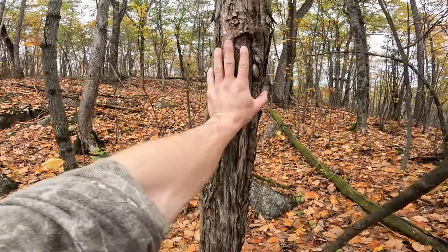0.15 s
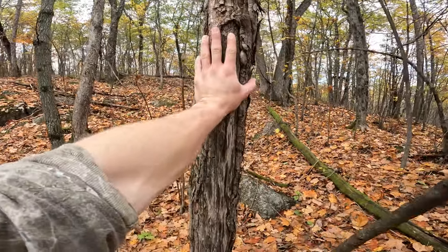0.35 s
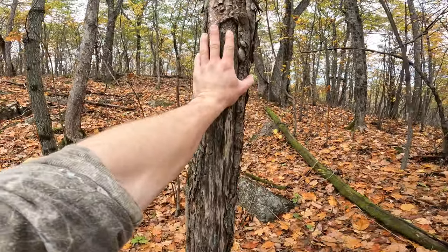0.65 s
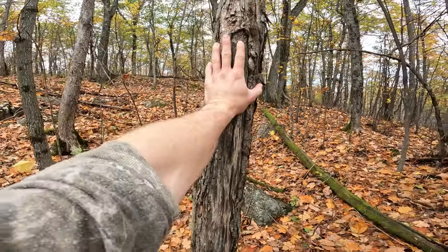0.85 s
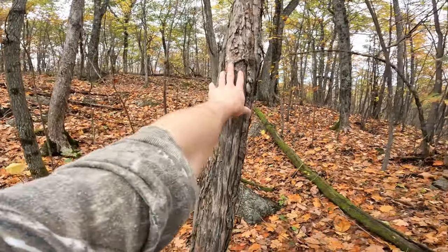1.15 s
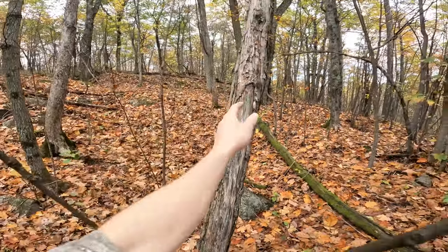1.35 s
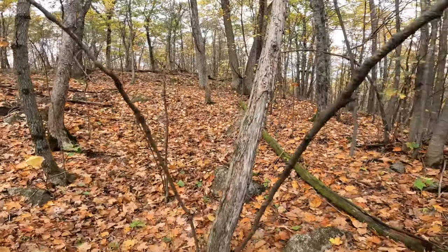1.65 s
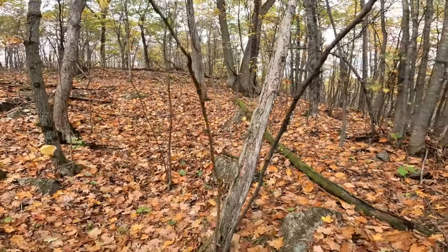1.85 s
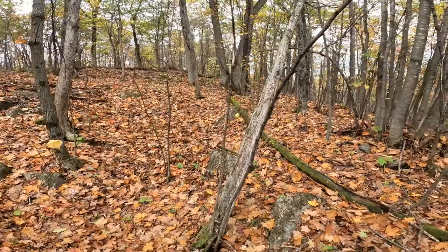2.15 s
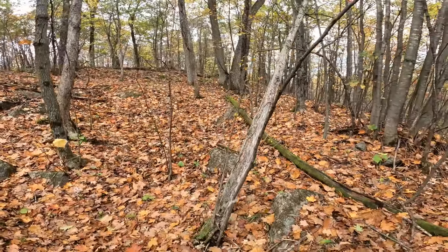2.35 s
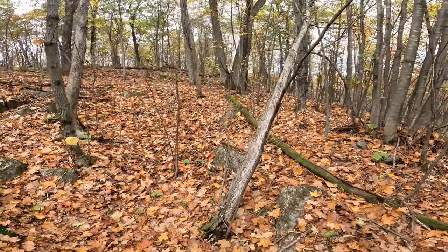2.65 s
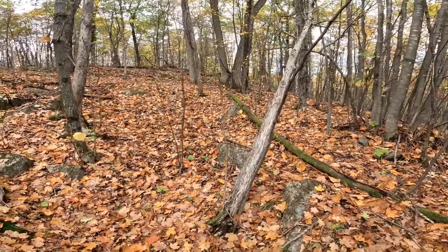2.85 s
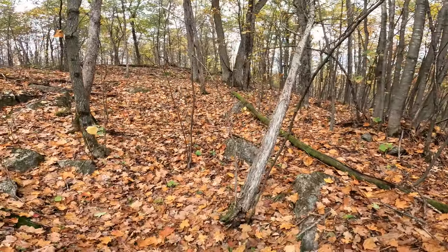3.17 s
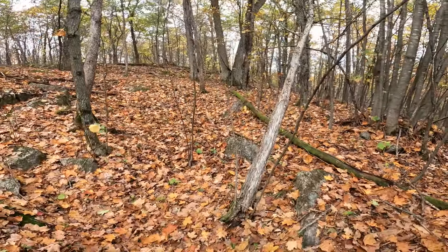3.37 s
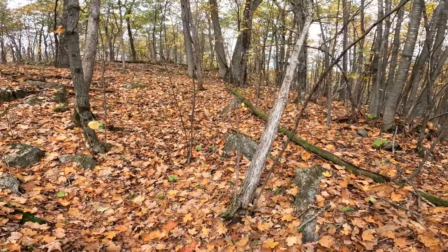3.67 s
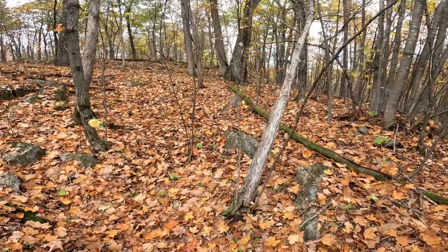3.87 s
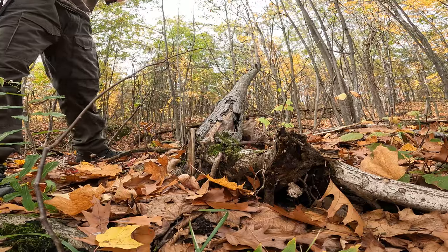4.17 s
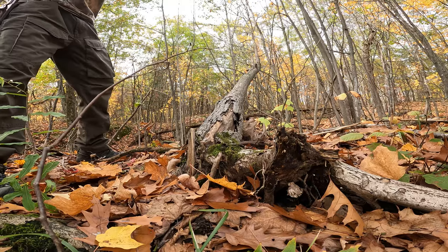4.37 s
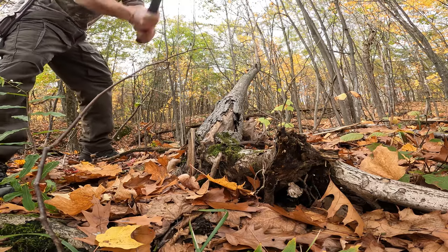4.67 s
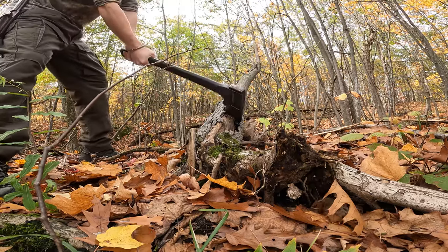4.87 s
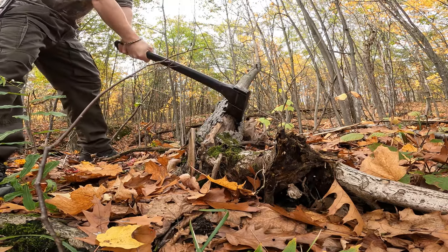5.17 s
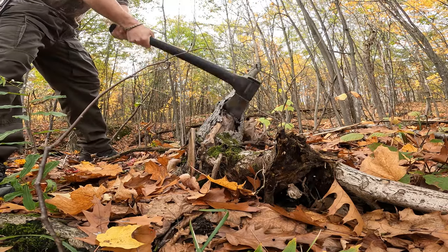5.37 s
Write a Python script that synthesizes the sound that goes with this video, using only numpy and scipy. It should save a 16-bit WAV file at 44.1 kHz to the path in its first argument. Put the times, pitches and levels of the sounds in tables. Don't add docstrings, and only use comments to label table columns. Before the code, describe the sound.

Rotten wood snaps and splinters with hollow knocks and leaf crackle, the fall fades, and a single axe chop lands close by.

```python
import sys
import numpy as np
from scipy import signal
from scipy.fft import rfft, irfft, next_fast_len
from scipy.io import wavfile
from scipy.ndimage import uniform_filter1d

SR = 44100
rng = np.random.default_rng(int(sys.argv[2]) if len(sys.argv) > 2 else 0)


def dump(signal):
    limited = np.clip(np.atleast_2d(signal).T, -1, 1)
    pcm = np.round(limited * 32767).astype(np.int16)
    wavfile.write(sys.argv[1], SR, pcm)


def how_loud(loudness_db):
    steps = np.asarray(loudness_db, float) / 20
    return 10 ** steps


N = 243431
SECONDS = np.arange(N) / SR
NEAR_GROUND = np.arange(N) > 4.27 * SR
LEFT_RIGHT = np.array([[1], [-1]])
LEAD, ROOM = 400, 2400


def rms_one(x):
    return x / np.sqrt(np.mean(x ** 2) + 1e-20)


def peak_one(x):
    return x / np.sqrt(2 * uniform_filter1d(x ** 2, size=50).max() + 1e-20)


def in_time(rows):
    s, *columns = np.transpose(rows)
    return [np.interp(SECONDS, s, c) for c in columns]


def coloured(x, points):
    size = next_fast_len(x.shape[-1])
    hz = np.arange(size // 2 + 1) * SR / size
    point_hz, point_db = np.transpose(points)
    level_db = np.interp(np.log(hz + 1), np.log(point_hz), point_db)
    return irfft(rfft(x, size) * how_loud(level_db), size)[..., :x.shape[-1]]


def band(x, low_hz, high_hz):
    return signal.sosfilt(signal.butter(2, [low_hz, high_hz], "band", fs=SR, output="sos"), x)


def resonance(x, hz, sharpness):
    return signal.lfilter(*signal.iirpeak(hz, sharpness, fs=SR), x)


def ring(clicks, hz, t60):
    r, w = how_loud(-60 / (max(t60, 1e-4) * SR)), 2 * np.pi * hz / SR
    return signal.lfilter([0, np.sin(w)], [1, -2 * r * np.cos(w), r * r], clicks + 1e-18)


def drift(rate):
    r = np.exp(-40 * np.pi * rate / SR)
    slow = signal.lfilter([1], [1, -2 * r, r * r], rng.standard_normal(N // 20 + 2002))[2000:]
    return np.interp(np.arange(N) / 20, np.arange(len(slow)), rms_one(slow))


def crackle(per_s, spread_db, hiss, clumps):
    sizes = how_loud(spread_db * np.minimum(rng.exponential(1, N), 5)) * rng.choice([-1, 1], N)
    happens = rng.random(N) < per_s * clumps / SR
    return sizes * happens + hiss * np.sqrt(clumps) * rng.standard_normal(N)


def many_pitches(clicks, low_hz, high_hz, count, cycles):
    pitches, dealt = np.geomspace(low_hz, high_hz, count), rng.integers(0, count, N)
    return sum(ring(clicks * (dealt == k), hz, cycles / hz) for k, hz in enumerate(pitches))


def swell(s, peak_db, length_s, rise):
    step = np.arange(0, N, 64) / SR
    late = (step - np.c_[s]) / np.maximum(np.c_[length_s], .005)
    fallen = np.where(late < 0, -late / rise, late)
    power = how_loud(2 * (np.c_[peak_db] - 10 * fallen)).sum(axis=0)
    return np.interp(SECONDS, step, power)


def sum_db(*powers):
    return 10 * np.log10(sum(powers) + 1e-12)


def tears(rows, rise, fall):
    ms = (np.arange(ROOM) - LEAD) * 1000 / SR
    length = np.maximum(np.array(rows)[:, 4:], .5)
    fibres = rng.standard_normal((len(rows), 2, len(ms)))
    growing = np.exp(np.minimum(ms, 0) / (rise * length))
    dying = np.exp(-np.abs(ms) / (fall * length))
    shape = np.where(ms < 0, growing, dying)
    shape = shape + how_loud(-18.5) * (ms > 0) * np.exp(-np.abs(ms) / 9.9)
    core = 6.0 * np.sign(fibres[:, 1, :1]) * (ms == 0) / length
    return fibres[:, 0] * how_loud(1.7 * fibres[:, 1]) * shape + core, ms


def add(out, s, sound, pan_db):
    at = round(s * SR) - LEAD
    out[:, at:at + len(sound)] += sound * how_loud(0.5 * pan_db * LEFT_RIGHT)


# (time [s], ring pitch [Hz], ring level [dB],
# thud level [dB])
HEAVY_KNOCKS = [(0.445, 970, -19, -17), (0.618, 595, -17.5, -36), (0.6583, 605, -15.5, -53),
                (0.855, 730, -15, -43), (0.933, 350, -22, -50), (0.9374, 360, -20, -24),
                (1.1777, 660, -23.5, -24.5), (1.2012, 430, -33, -38), (1.319, 390, -18.5, -14.5),
                (1.3356, 1110, -23, -29), (1.371, 826, -16.5, -20.5), (1.846, 865, -24.5, -43),
                (1.8526, 720, -27, -25), (1.867, 760, -19.5, -27), (2.1276, 530, -22, -40.5),
                (2.3346, 570, -18.5, -20.5), (2.3924, 740, -20, -40), (3.19, 360, -36.5, -39),
                (3.471, 378, -42, -42), (3.511, 433, -44, -33), (4.129, 360, -65, -43),
                (4.633, 440, -40.5, -37.5), (4.6876, 364, -42.5, -37.5), (4.8614, 877, -32.5, -46.5),
                (4.8718, 870, -18.5, -22.5)]
# (time [s], ring pitch [Hz], ring level [dB])
BRANCH_TAPS = [(0.6996, 885, -25), (0.7156, 890, -18.5), (0.7395, 905, -22), (0.7463, 910, -21),
               (0.775, 860, -26), (0.8913, 695, -26.5), (1.021, 1150, -27), (1.1224, 584, -33.5),
               (1.4553, 370, -38), (1.4818, 800, -22.5), (1.999, 420, -24.5), (2.058, 516, -23.5),
               (2.2289, 604, -26.5), (2.7584, 550, -31.5), (3.0765, 1080, -31.5), (3.0914, 1120, -28),
               (3.789, 1190, -33), (4.3256, 1110, -37), (5.054, 1055, -38.5)]


def knock_rows():
    breaks = [(*r, 1000 * 5.5 / r[1]) for r in HEAVY_KNOCKS]
    return breaks + [(*r, r[2] - 20.5, 1000 * 2.4 / r[1]) for r in BRANCH_TAPS]


# (pitch [Hz], level [dB], fade by 60 dB [s])
TRUNK_THUD = [(188, 9, 0.026), (275.3, -12, 0.064), (130, -21, 0.054)]


def knocks():
    out = np.zeros((2, N + ROOM))
    rows = knock_rows()
    bursts, ms = tears(rows, rise=0.31, fall=0.13)
    woody, place = band(bursts, 330, 1300), rng.uniform(-1, 1, len(rows))
    push = (ms > -1.5) * (ms < 0) * 1.
    thud = sum(how_loud(db) * ring(push, hz, t60) for hz, db, t60 in TRUNK_THUD)
    thud = thud * np.cos(np.clip(ms / 29, 0, np.pi / 2))
    thud = peak_one(band(thud, 185, 410))
    for k, (s, hz, ring_db, thud_db, _) in enumerate(rows):
        body = peak_one(ring(woody[k], hz, 8.2 / hz)) + 0.082 * peak_one(woody[k])
        sound = how_loud(ring_db) * peak_one(body) + how_loud(thud_db - 0.5) * thud
        add(out, s - .0008, sound, 1.2 * place[k])
    return out[:, :N]


# (time [s], ring pitch [Hz], #
# ring level [dB], bright level [dB])
TWIG_SNAPS = [(0.4348, 1600, -14, -26.5), (0.586, 2770, -14.5, -24.5), (0.6154, 1870, -14, -23.5),
              (0.7386, 1120, -28, -41), (0.8434, 2000, -19, -29), (0.901, 2620, -27, -49),
              (0.93, 3120, -13.5, -21), (0.972, 1740, -28, -55), (1.0208, 1190, -26.5, -28.5),
              (1.094, 3000, -28.5, -32), (1.2562, 1220, -33.5, -42), (1.334, 1430, -18, -36),
              (1.3583, 3090, -53, -31), (1.37, 1610, -13, -26.5), (1.681, 3530, -51, -34),
              (1.89, 2150, -23, -29), (2.1272, 1220, -27, -36), (2.152, 2640, -24, -31.5),
              (2.2308, 2820, -15, -8), (2.291, 1710, -46, -25), (2.3264, 1410, -14, -26),
              (2.332, 1280, -15.5, -23), (2.47, 1780, -21, -33), (2.5253, 3320, -27, -13),
              (2.6938, 3400, -28, -45), (2.7231, 2710, -55, -20), (3.3503, 1260, -28, -29),
              (3.791, 2440, -36, -13), (4.3253, 2300, -32, -37), (4.8825, 4900, -31.5, -22)]
# (time [s], ring pitch [Hz], ring level [dB], bright level [dB])
FIBRE_TEARS = [(0.4434, 1730, -15.5, -22), (0.656, 2450, -18.5, -26.5), (0.6993, 1640, -26, -31),
               (0.716, 1990, -16.5, -28), (0.746, 1390, -22, -32), (0.776, 1190, -24.5, -34),
               (0.811, 1160, -27.5, -30), (0.817, 1530, -27, -32), (0.852, 1520, -14, -23),
               (0.937, 1300, -17.5, -36), (1.171, 1420, -19.5, -29), (1.1783, 2580, -21.5, -26),
               (1.3177, 2170, -14.5, -20.5), (1.481, 2010, -25, -29), (1.8506, 2460, -21, -37),
               (1.867, 2680, -21, -36), (1.9014, 1810, -40, -24.5), (2.199, 1440, -25, -41),
               (2.339, 1150, -44, -41), (2.3907, 1150, -19.5, -45), (2.3964, 2550, -20, -24.5),
               (2.4081, 2860, -24, -32), (2.738, 1390, -30, -30), (2.7537, 2850, -27.5, -33),
               (2.8595, 1890, -32.5, -27), (2.971, 1900, -29.5, -33.5), (3.2455, 2960, -28, -35),
               (3.5092, 2730, -27, -37), (3.6868, 3270, -37, -31), (3.7963, 2750, -28.5, -29)]
# (time [s], ring pitch [Hz], ring level [dB])
BARK_FLAKES = [(0.5187, 1940, -36), (0.5755, 1580, -34), (0.648, 2090, -34), (1.007, 1240, -32),
               (1.124, 1140, -33.5), (1.1315, 1380, -33), (1.201, 3040, -32.5), (1.454, 1310, -37),
               (1.551, 3080, -33), (1.663, 1680, -38), (1.983, 1140, -42), (2.2771, 1840, -33),
               (3.5212, 3230, -35), (4.0303, 2520, -38), (4.455, 3080, -47.5), (4.573, 3370, -40),
               (4.6322, 2550, -31.5), (4.6864, 1430, -39.5), (4.862, 3000, -46.5), (4.8730, 3200, -41),
               (4.9177, 3420, -45), (5.214, 2930, -51.5), (5.496, 2990, -48.5)]
# (time [s], bright level [dB])
DRY_TICKS = [
    (0.035, -67),
    (0.06, -54.5),
    (.085, -55),
    (0.121, -51),
]


def snap_rows():
    twig_ms, fibre_ms, flake_ms = 1.75, 5.04, 3.2
    twigs = [(*r, twig_ms * .5 ** np.clip((r[3] - r[2]) / 24, -.3, 1.2)) for r in TWIG_SNAPS]
    fibres = [(*r, fibre_ms) for r in FIBRE_TEARS]
    flakes = [(*r, r[2] - 3, flake_ms) for r in BARK_FLAKES]
    return twigs + fibres + flakes + [(s, 3000, db - 32, db, flake_ms) for s, db in DRY_TICKS]


# (pitch [Hz], level [dB per Hz])
DRY_LEAF_TONE = [(240, -25.5), (450, -3.5), (1100, -2), (2600, -3), (4200, -2.5), (5300, -5), (7000, -3),
                 (8800, -12.5), (10900, -21), (12100, -20), (14600, -32.5), (16000, -47.5)]


def snaps():
    out = np.zeros((2, N + ROOM))
    rows = snap_rows()
    bursts, _ = tears(rows, rise=0.31, fall=0.33)
    piece = rng.uniform(-0.64, 1, (len(rows), 2))
    woody = band(bursts, 920, 5100)
    bright = coloured(band(band(bursts, 4200, 16500), 3600, 22000), DRY_LEAF_TONE)
    for k, (s, hz, ring_db, bright_db, _) in enumerate(rows):
        neighbour = ring(woody[k], 2100 * 1.6 ** piece[k, 0], 0.001)
        body = peak_one(ring(woody[k], hz, 14.0 / hz))
        body = body + 0.99 * peak_one(neighbour) + 0.32 * peak_one(woody[k])
        sound = how_loud(ring_db) * peak_one(body) + how_loud(bright_db) * peak_one(bright[k])
        add(out, s, sound, 1.8 * piece[k, 1])
    return out[:, :N]


# (pitch [Hz], level [dB], fade by 60 dB [s], start after the blow [ms])
FALLEN_LOG = [(149.8, -12, .157, 3.7), (184.8, -10, .1, 4.62), (226, -14, .09, 3.72),
              (433, -9.5, .024, .23), (883, -7, .013, .58), (1182, -5.5, .02, -.3), (1600, -17, .008, .3),
              (3080, -6.5, .0042, .8), (3680, -21, .009, .9), (600, -17, .012, 3.9)]


def axe():
    strike_s, strike_db = 4.8822, .4
    out = np.zeros(N)
    for hz, db, t60, start_ms in FALLEN_LOG:
        blow = np.zeros(N)
        blow[round((strike_s + start_ms / 1000) * SR)] = how_loud(strike_db + db)
        out += ring(blow, hz, t60)
    out = out - .6 * resonance(out, 2150, 6)
    return band(out, 80, 13000)


# (time [s], level [dB])
BOUGH_RUBBING = [(1.2, -75), (1.6, -55.5), (1.9, -51), (2.1, -41.5), (2.24, -45), (2.27, -52), (2.5, -42),
                 (2.66, -65), (2.84, -52), (2.92, -81)]
# (pitch [Hz], level [dB], fade by 60 dB [s])
BOUGH_NOTES = [(510, 3.5, 0.012), (740, -16, 0.015), (992, -6.5, 0.051)]


def bough():
    level_db, = in_time(BOUGH_RUBBING)
    slips = crackle(260, 2.5, 0.038, how_loud(3.1 * drift(19)))
    rings = sum(how_loud(db) * ring(slips, hz, t60) for hz, db, t60 in BOUGH_NOTES)
    return how_loud(level_db) * rms_one(rings)


def bits(rows, length_ms, cycles, spit):
    out = np.zeros((2, N + ROOM))
    bursts, _ = tears([(*r, 0, length_ms) for r in rows], rise=0.9, fall=0.67)
    place = rng.uniform(-1, 1, len(rows))
    for k, (s, hz, ring_db) in enumerate(rows):
        broad = band(bursts[k], hz / 2.13, min(hz * 2.4, 16000))
        broad = coloured(broad, [(8000, -3), (16000, -20.5)])
        body = peak_one(ring(broad, hz, cycles / hz)) + spit * peak_one(broad)
        add(out, s, how_loud(ring_db) * peak_one(body), 2.5 * place[k])
    return out[:, :N]


# (time [s], ring pitch [Hz], ring level [dB])
BOUGH_BUMPS = [(0.1676, 630, -55), (0.1941, 580, -59.0), (0.476, 905, -40), (0.5767, 925, -45),
               (0.9737, 980, -48), (1.0678, 660, -48), (1.0884, 540, -48), (1.0945, 570, -37),
               (1.1409, 540, -38), (1.2582, 540, -38), (1.3199, 487, -30), (1.5521, 580, -38),
               (1.6603, 890, -36.5), (1.8, 610, -45), (1.8519, 720, -30), (1.9171, 570, -26),
               (2.1135, 1020, -26), (2.1643, 950, -44), (2.2288, 740, -37), (2.3002, 654, -33),
               (2.3281, 640, -22), (2.4611, 636, -32), (2.5794, 970, -36.5), (2.6245, 975, -33.5),
               (2.6515, 990, -30.5), (2.6644, 1090, -30), (2.6729, 940, -35), (2.7376, 1060, -43),
               (2.7986, 720, -38), (2.8346, 1010, -35), (2.9244, 1030, -38), (3.0681, 990, -51),
               (3.1267, 1000, -38.5), (3.6057, 1010, -50.0), (3.6917, 520, -59), (4.0317, 1090, -62),
               (4.1797, 1120, -50.0), (4.2341, 1070, -46), (4.3548, 650, -61), (4.5122, 1060, -64),
               (4.5717, 1020, -48), (4.7404, 540, -59), (5.0538, 1050, -47), (5.1271, 540, -50.5),
               (5.4916, 1014, -61), (5.4972, 1030, -57.5)]
# (time [s], ring pitch [Hz], ring level [dB])
BARK_CHIPS = [(0.1486, 1490, -59.0), (0.4099, 1700, -42), (0.4761, 2230, -39), (0.5094, 1750, -37.5),
              (0.5665, 2480, -40), (1.0447, 1490, -39), (1.1116, 3120, -34), (1.1526, 2630, -31),
              (1.351, 1980, -38), (1.5081, 3080, -40), (1.6134, 2380, -37), (1.7102, 1360, -37),
              (1.9005, 2000, -36), (1.9438, 3750, -35), (2.4647, 1990, -30.5), (2.6742, 1360, -31),
              (2.73, 2700, -30), (2.8379, 2960, -33.5), (2.9206, 1440, -39), (3.0681, 1530, -40),
              (3.447, 2870, -36.5), (3.5322, 3680, -41), (3.6451, 1920, -42), (3.936, 2440, -48),
              (4.2301, 1720, -39), (4.5833, 1440, -59), (4.6198, 1560, -45), (4.702, 1400, -53),
              (4.7124, 2510, -47), (4.9182, 3200, -36), (5.1197, 2770, -47), (5.1673, 2580, -61),
              (5.198, 3660, -49.5), (5.2525, 2760, -55), (5.2832, 2850, -54.5), (5.4204, 3000, -54)]
# (time [s], ring pitch [Hz], ring level [dB])
LEAF_CRACKS = [(0.325, 7400, -47), (0.3719, 7100, -43), (0.5483, 7170, -41), (0.5606, 4460, -40),
               (0.7094, 4400, -30), (0.7539, 6200, -37), (0.8906, 4820, -29), (0.9057, 4650, -34),
               (0.9651, 4700, -44), (1.1112, 4190, -39), (1.1371, 7400, -38), (1.1524, 4340, -37),
               (1.2241, 4840, -46), (1.2742, 6390, -46), (1.327, 6860, -42.0), (1.4707, 4150, -44.0),
               (1.5553, 4550, -36), (1.5888, 5010, -45), (1.6273, 5050, -40), (1.6338, 6080, -44.0),
               (1.6739, 7500, -33.5), (1.9256, 5970, -37), (2.1283, 4230, -24.5), (2.277, 7200, -29),
               (2.3112, 7270, -30.0), (2.3392, 7950, -22), (2.6758, 4200, -32), (2.7971, 6960, -31),
               (3.2523, 5880, -37.0), (3.5899, 4330, -34), (3.6468, 4500, -36.5), (3.9358, 7000, -49.0),
               (3.9667, 7140, -42), (4.0265, 4020, -38), (4.5338, 7650, -63), (4.8403, 7930, -55),
               (4.9603, 4590, -40), (5.1197, 6870, -45), (5.167, 5870, -48), (5.1762, 7640, -52),
               (5.2077, 7250, -43), (5.2318, 4280, -50), (5.2458, 7760, -49), (5.2824, 6580, -54)]


def small_pieces():
    bumps = bits(BOUGH_BUMPS, length_ms=6.0, cycles=4.7, spit=0.25)
    chips = bits(BARK_CHIPS, length_ms=1.96, cycles=18.0, spit=0.32)
    return bumps + chips + bits(LEAF_CRACKS, length_ms=1.1, cycles=14.9, spit=0.23)


def scrape(crunch_db):
    slips = crackle(700, 1.9, 0, how_loud(5.0 * drift(15)))
    rings = many_pitches(slips, 480, 1600, count=9, cycles=6.3)
    return how_loud(crunch_db - 12.5) * rms_one(band(rings, 420, 2500))


def grit(crunch_db):
    cracks = crackle(170, 3.76, 0, how_loud(4.0 * drift(13)))
    rings = many_pitches(cracks, 900, 6500, count=14, cycles=7.0)
    return how_loud(crunch_db - 8.0) * rms_one(band(rings, 700, 9000))


def crumbs(crackle_db):
    ticks = crackle(85, 2.8, 0, how_loud(9.0 * drift(2.2)))
    ticks = band(coloured(ticks, DRY_LEAF_TONE), 1800, 14000)
    return how_loud(crackle_db - 14.5) * rms_one(ticks)


# (time [s], vigour [dB], fineness [dB])
LITTER_RUSTLE = [(0, -64, -12), (.19, -61.5, -3), (.41, -53.5, 0), (.73, -46, -13.5), (1.07, -49.5, -2.5),
                 (1.27, -54.5, 1), (1.63, -49.5, 0), (1.82, -44, -1.4), (2.21, -33.5, -2), (2.27, -72, 2),
                 (2.68, -41, 0.5), (3.0, -46.5, 2), (3.5, -52, 6), (3.92, -69.5, 15.5), (4.36, -63, 14.5),
                 (4.41, -62.5, -2.5), (4.83, -64, 0), (5.37, -73, 6.5)]
# (time [s], peak level [dB], fineness [dB], length [s])
LITTER_SCUFFS = [(0.881, -37.5, -9, 0.1), (1.155, -39.5, -23, 0.059), (1.676, -44.5, 3.5, 0.06),
                 (1.863, -29, -7, 0.087), (2.322, -36.5, -0.5, 0.21), (2.521, -40.5, 5.5, 0.046),
                 (2.672, -34.5, -23, 0.043), (2.939, -43, 0, 0.039), (3.22, -45, -1, 0.35),
                 (3.528, -49.5, 9, 0.037), (3.8, -58.5, 18.5, 0.074), (4.094, -47, 6.5, 0.059),
                 (4.17, -46, -1, 0.017), (4.242, -49.5, -1.5, 0.05), (4.64, -56, 1.5, 0.13),
                 (4.876, -40.5, -30, 0.098), (5.028, -53, 2, 0.15), (5.51, -57, 0, 0.091)]
# (time [s], peak level [dB], length [s])
GROUND_STEPS = [
    (3.81, -51, 0.034),
    (4.346, -57, 0.33),
    (4.897, -42, 0.093),
]


def litter():
    vigour_db, fine_db = in_time(LITTER_RUSTLE)
    s, db, fine, length = np.transpose(LITTER_SCUFFS)
    hit_s, _, hit_db = np.transpose(knock_rows())[:3]
    scuff = swell(s, db, length, rise=0.047)
    debris = swell(hit_s, hit_db - 23, 0.029 + 0 * hit_s, rise=0.14)
    crunch_db = sum_db(how_loud(2 * vigour_db), scuff, debris)
    fine_scuff = swell(s, db + fine, length, rise=0.4)
    crackle_db = sum_db(how_loud(2 * (vigour_db + fine_db)), fine_scuff)
    shaken = swell(hit_s, hit_db - 21, 0.039 + 0 * hit_s, rise=0.56)
    shaken = shaken + swell(*np.transpose(GROUND_STEPS), rise=.15)
    stir_db = sum_db(how_loud(2 * (vigour_db - 8.5)), scuff * how_loud(2 * -7), shaken)
    return crunch_db, crackle_db, stir_db


# (pitch [Hz], side minus middle [dB])
STEREO_WIDTH = [(200, -16), (1500, -12), (3000, -8.5), (6000, -10), (9500, -10), (13000, 1)]


def leaves(crunch_db, crackle_db):
    shared_db = 2.0 * drift(20) + 2.5 * drift(72)
    clumps, fine = how_loud(shared_db + 2.0 * drift(24)), how_loud(shared_db + 2.2 * drift(20))
    big = np.array([crackle(970, 2.38, 0.28, clumps), crackle(1100, 5.93, 0.42, clumps)])
    small = np.array([crackle(3000, 2.68, 0.51, fine), crackle(3000, 4.76, 0.53, fine)]) + 0.33 * big
    low = band(coloured(big, DRY_LEAF_TONE), 260, 3200)
    high = band(coloured(small, DRY_LEAF_TONE), 2200, 22000)
    mid, side = how_loud(crunch_db + 1.16) * rms_one(low) + how_loud(crackle_db + 1.5) * rms_one(high)
    both = mid + 0.68 * coloured(side, STEREO_WIDTH) * LEFT_RIGHT
    faint = np.clip((-46.0 - crackle_db) / 12.0, 0, .7)
    return both - faint * resonance(both, 5300, 3.0)


def stir(stir_db):
    mid, side = band(rng.standard_normal((2, N)), 100, 300)
    return how_loud(stir_db - 3.5 + 2.9 * drift(5.7)) * rms_one(mid + 0.17 * side * LEFT_RIGHT)


def forest(x):
    t = np.arange(SR // 3) / SR
    fade = how_loud(-60 * t / 0.21) * (t > .006)
    tail = band(rng.standard_normal((2, len(t))), 260, 8300) * fade
    tail = tail[0] + .5 * tail[1] * LEFT_RIGHT
    tail = tail / np.sqrt(np.sum(tail[0] ** 2))
    return how_loud(-39) * signal.fftconvolve(x[None], tail, axes=1)[:, :N]


# (time [s], peak level [dB], length [s])
MICROPHONE_JOLTS = [(0.478, -37.5, .03), (0.517, -43, 0.15), (0.656, -39, 0.093), (0.88, -44.5, 0.15),
                    (1.197, -37, 0.03), (1.336, -29.5, 0.02), (1.39, -30, 0.064), (1.713, -48, 0.31),
                    (1.976, -34.5, 0.2), (2.294, -28.5, 0.12), (2.403, -17, 0.015), (2.44, -16, 0.027),
                    (2.527, -31, 0.023), (2.6, -30.5, 0.036), (2.77, -43, 0.13), (2.938, -47.5, 0.078),
                    (3.13, -47.5, 0.11), (3.26, -38, 0.15), (3.46, -44, 0.078), (3.72, -55, 0.16),
                    (4.0, -50, 0.19), (4.161, -42, 0.022), (4.518, -48, 0.12), (4.927, -24, 0.078),
                    (5.014, -41, 0.076)]
# (pitch [Hz], level [dB per Hz])
RUMBLE_TONE = [(12, -18), (25, -1.5), (45, 0), (70, -11), (110, -20.5), (300, -33.5), (600, -77.5)]
# (time [s], left minus right [dB])
WIND_SIDE = [(0, -1), (1.7, 0), (2.4, -7), (2.9, -1), (3.3, -6), (3.6, -3), (5.52, -0.5)]


def rumble():
    calm_db = -59
    level_db = sum_db(how_loud(2 * calm_db), swell(*np.transpose(MICROPHONE_JOLTS), rise=0.49))
    pan_db, = in_time(WIND_SIDE)
    mid, side = coloured(rng.standard_normal((2, N)), RUMBLE_TONE)
    sway = np.sqrt(uniform_filter1d(uniform_filter1d(mid ** 2, size=2600), size=2600))
    lumps = how_loud(level_db + 1.5) * (mid + 0.096 * side * LEFT_RIGHT) / sway
    lumps = np.where(NEAR_GROUND, band(lumps, 64, 400), lumps)
    return lumps * how_loud(0.5 * pan_db * LEFT_RIGHT)


# (pitch [Hz], level [dB per Hz])
STILL_AIR_TONE = [(200, -24.5), (500, -23), (4000, -31.5), (5300, -48.5), (6700, -28), (10600, -42),
                  (12000, -37), (16000, -55.5)]


def air():
    mid, side = coloured(rng.standard_normal((2, N)), STILL_AIR_TONE)
    bed = rms_one(mid + coloured(side, STEREO_WIDTH) * LEFT_RIGHT)
    hum = rms_one(band(rng.standard_normal(N), 84, 170)) * NEAR_GROUND
    return how_loud(-67) * bed + how_loud(-59.5) * hum


def scene():
    crunch_db, crackle_db, stir_db = litter()
    hush_db = np.minimum(crackle_db + 63.5, 0) * 4.8
    blows = snaps() + knocks() + axe()
    centre = blows.mean(axis=0)
    shading = 0.55 * coloured(np.roll(centre, shift=37), STEREO_WIDTH) * LEFT_RIGHT
    to_right = how_loud(-0.5 * LEFT_RIGHT)
    near = (blows + scrape(crunch_db) + crumbs(crackle_db)) * to_right + shading
    near = near + leaves(crunch_db + 0.79 * hush_db, crackle_db + hush_db) * how_loud(-0.6 * LEFT_RIGHT)
    around = near + forest(centre) + stir(stir_db) + rumble() + air()
    small = small_pieces() + bough() + grit(crunch_db)
    both = around + small * to_right
    return both + NEAR_GROUND * 0.55 * band(both, 8960, 16000)


def limiter(x):
    limit_db, share, recover_db_per_s, grab_hz = -5.5, 0.31, 67.5, 45
    climb = recover_db_per_s * np.arange(N) / SR
    peak_db = 20 * np.log10(np.abs(x).max(axis=0) + 1e-9)
    held_db = np.maximum.accumulate(peak_db + climb) - climb
    r = np.exp(-2 * np.pi * grab_hz / SR)
    pull_db = signal.lfilter([1 - r], [1, -r], np.maximum(held_db - limit_db, 0))
    return x * how_loud(-share * pull_db)


def microphone(x):
    x = x + 0.25 * resonance(x, 12000, 14.0)
    return signal.sosfilt(signal.cheby2(8, 50, 17000, fs=SR, output="sos"), x)


def low_pass(x):
    return signal.sosfilt(signal.butter(12, 16840, fs=SR, output="sos"), x)


def record(dry):
    mix = microphone(np.clip(limiter(dry), -1, 1))
    return low_pass(mix)


dry = scene()
out = record(dry)
dump(out)
```